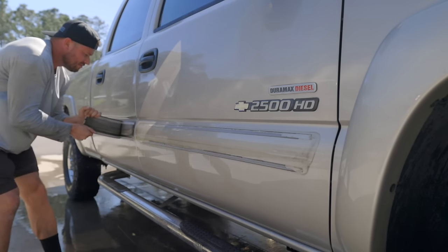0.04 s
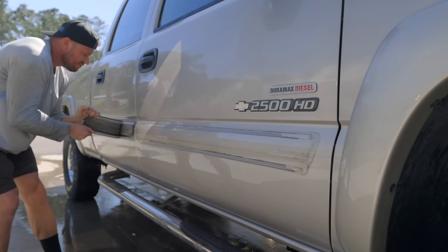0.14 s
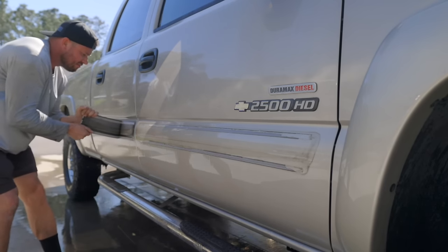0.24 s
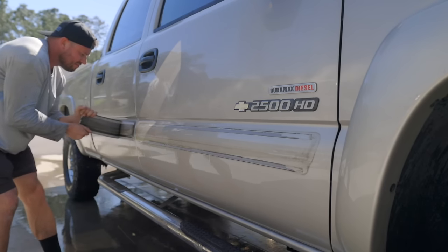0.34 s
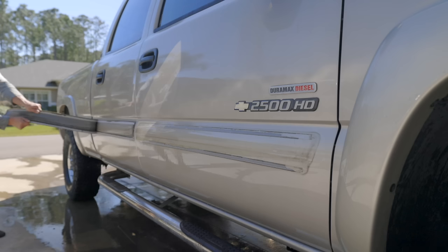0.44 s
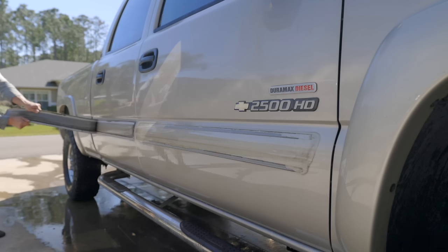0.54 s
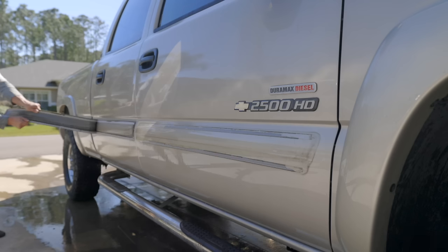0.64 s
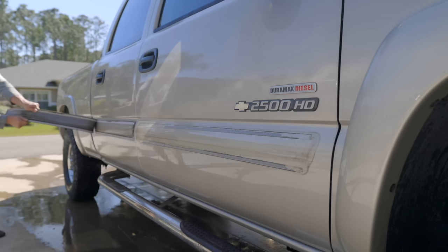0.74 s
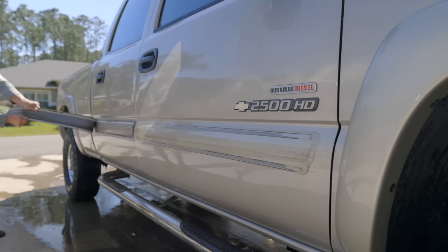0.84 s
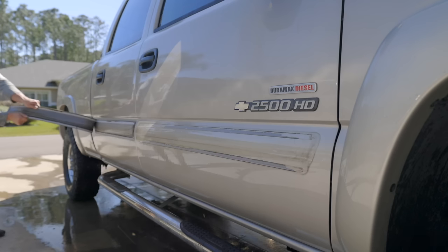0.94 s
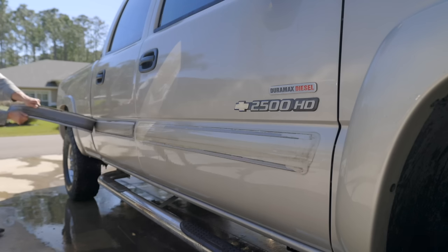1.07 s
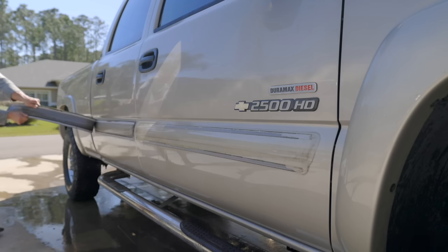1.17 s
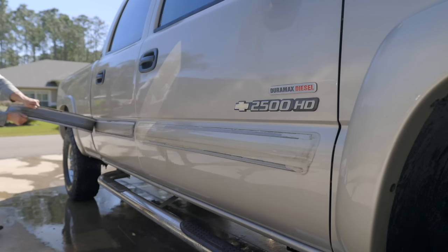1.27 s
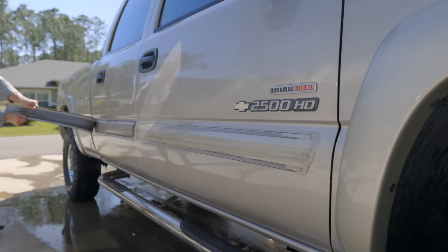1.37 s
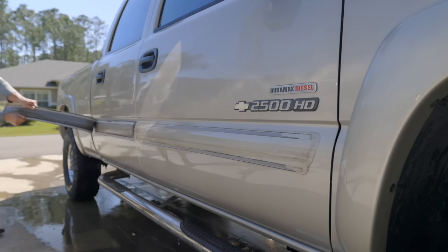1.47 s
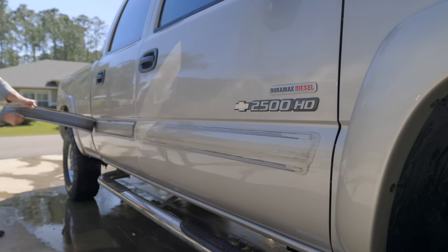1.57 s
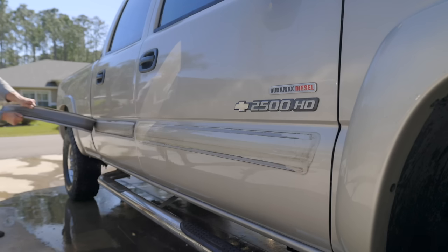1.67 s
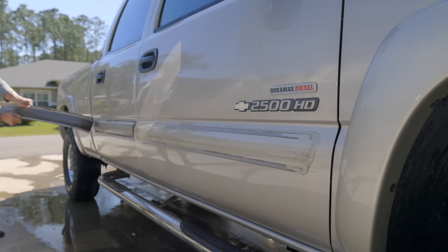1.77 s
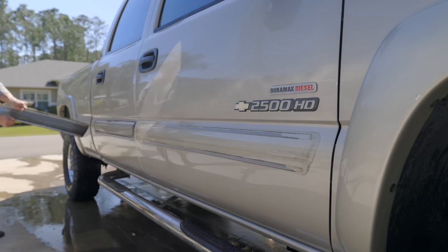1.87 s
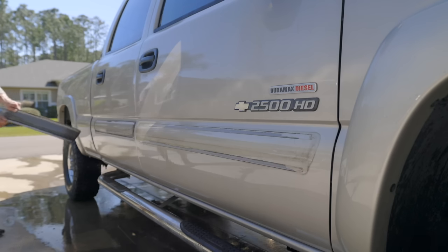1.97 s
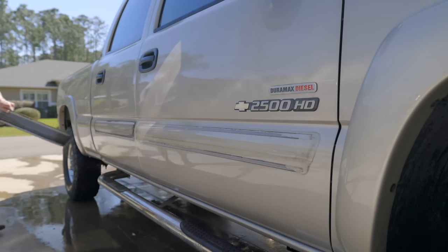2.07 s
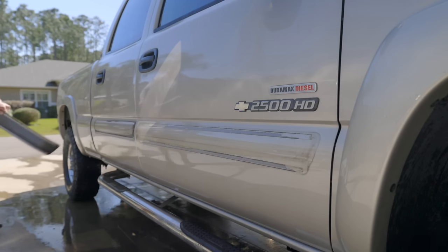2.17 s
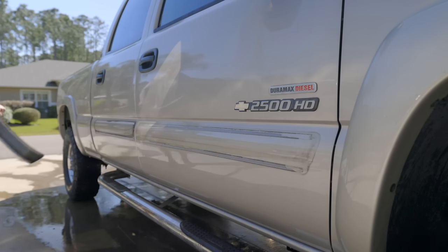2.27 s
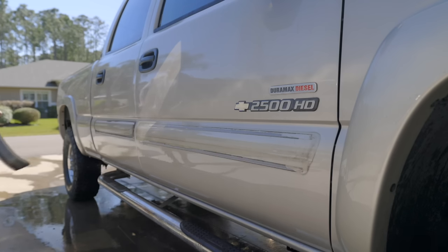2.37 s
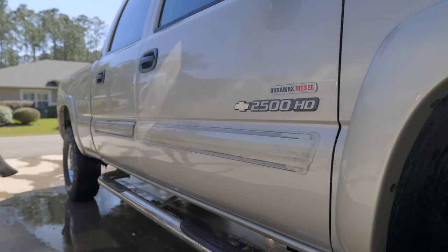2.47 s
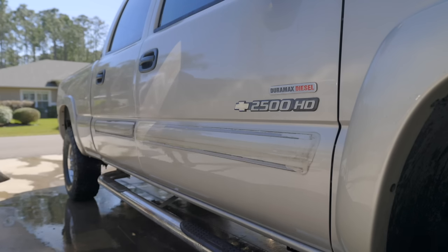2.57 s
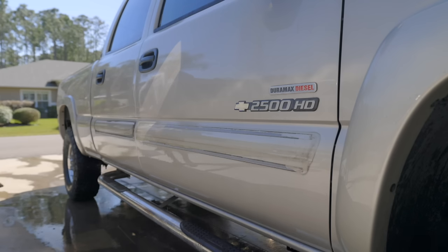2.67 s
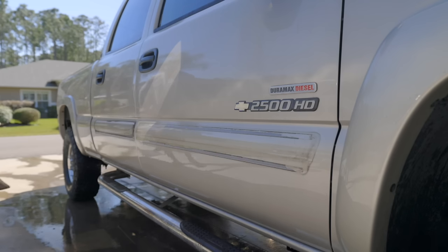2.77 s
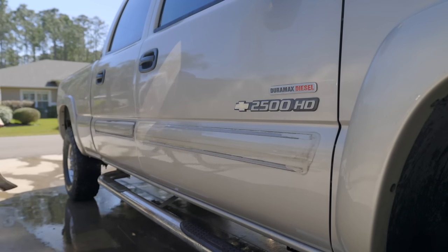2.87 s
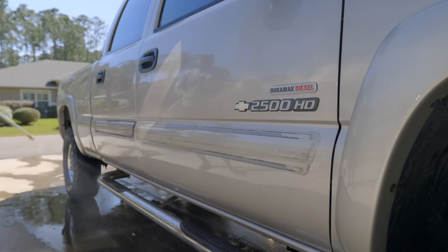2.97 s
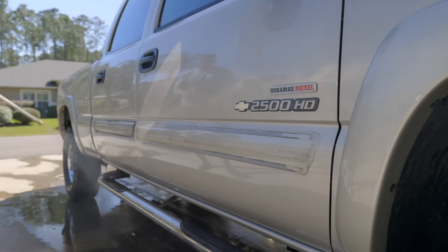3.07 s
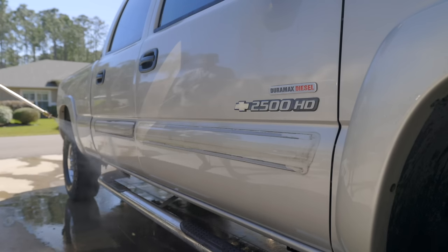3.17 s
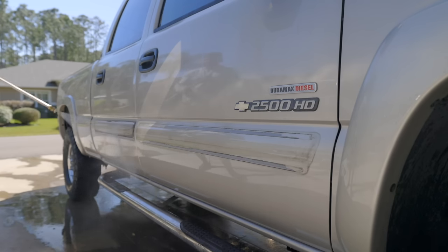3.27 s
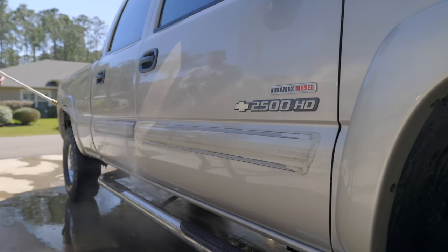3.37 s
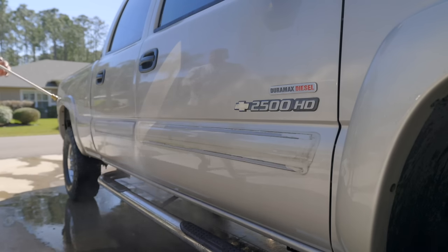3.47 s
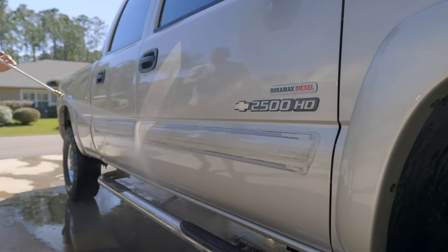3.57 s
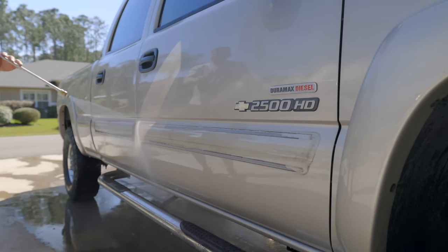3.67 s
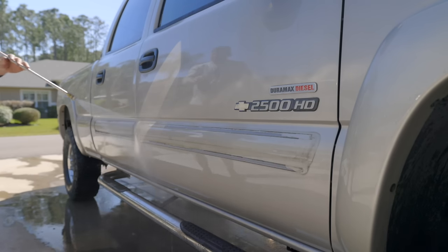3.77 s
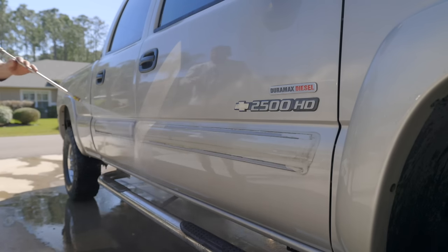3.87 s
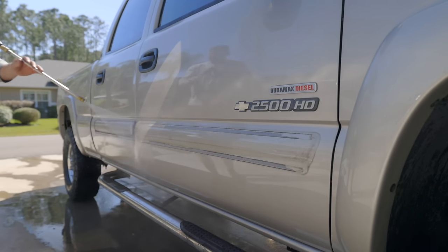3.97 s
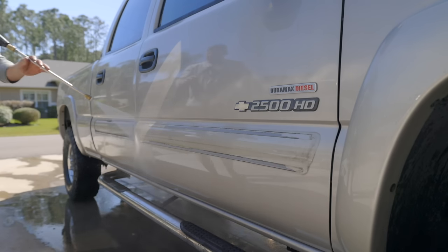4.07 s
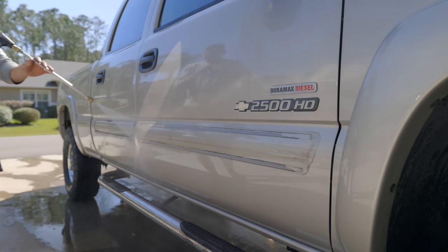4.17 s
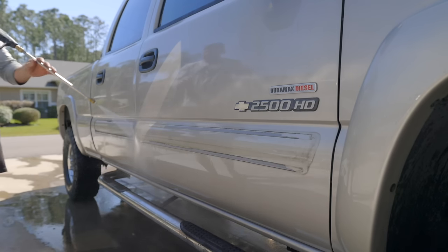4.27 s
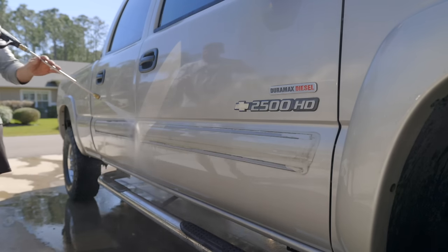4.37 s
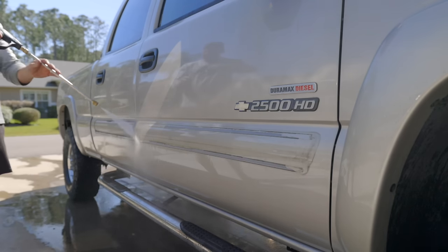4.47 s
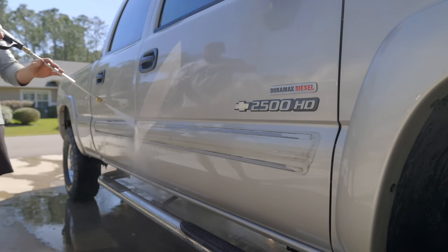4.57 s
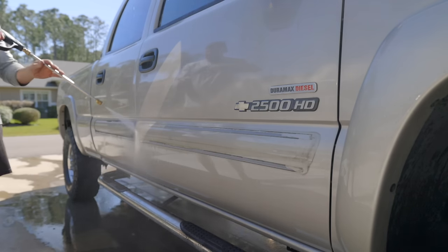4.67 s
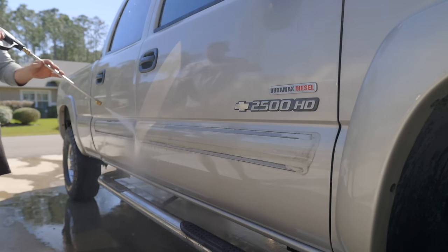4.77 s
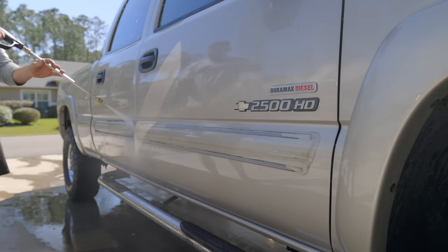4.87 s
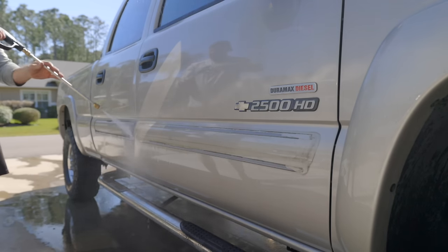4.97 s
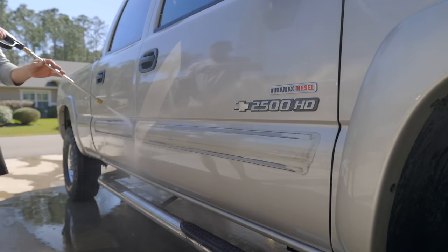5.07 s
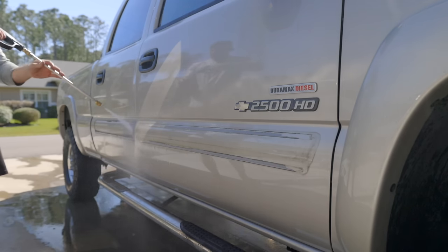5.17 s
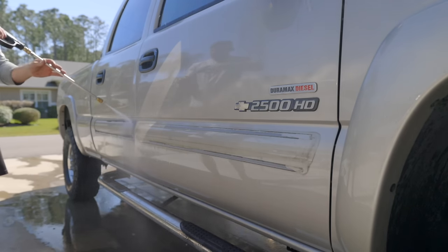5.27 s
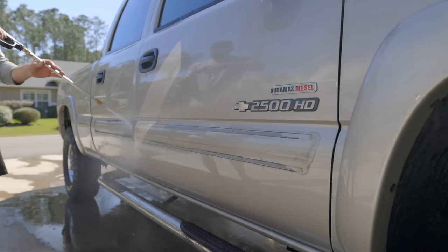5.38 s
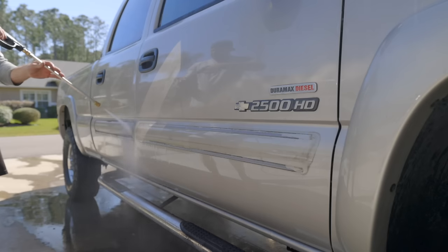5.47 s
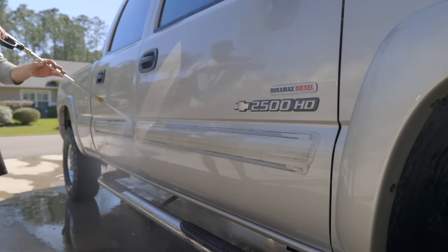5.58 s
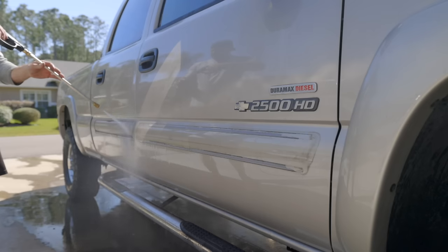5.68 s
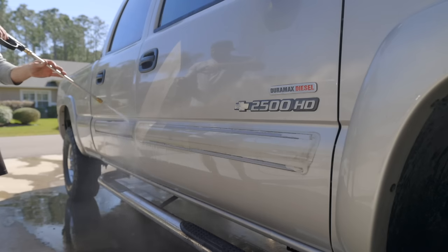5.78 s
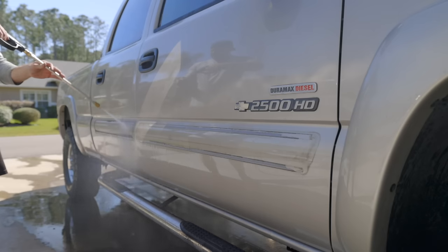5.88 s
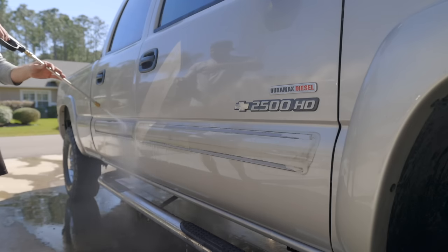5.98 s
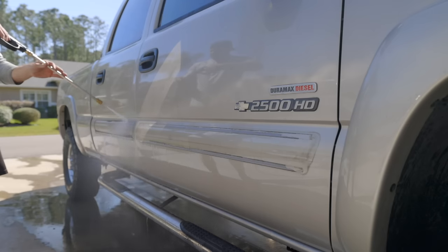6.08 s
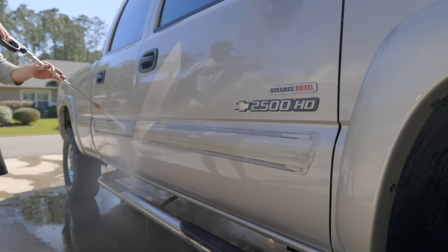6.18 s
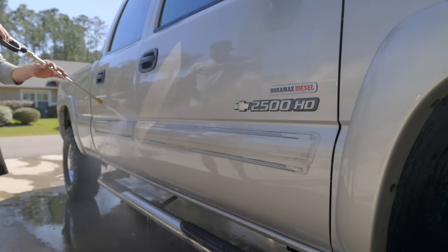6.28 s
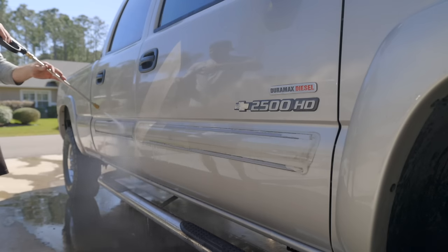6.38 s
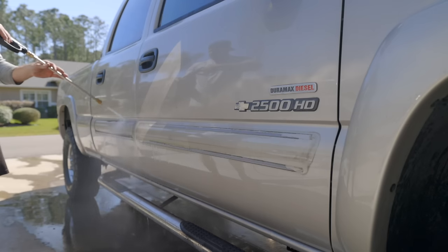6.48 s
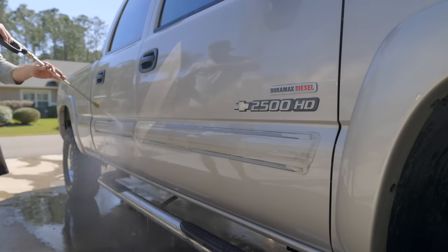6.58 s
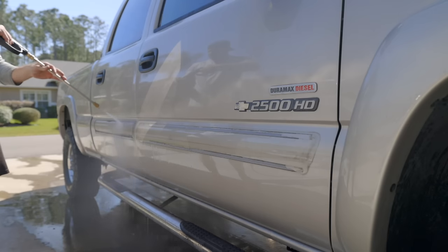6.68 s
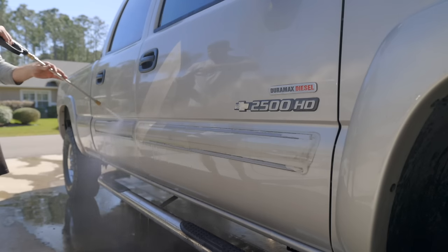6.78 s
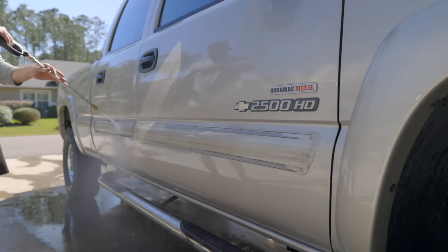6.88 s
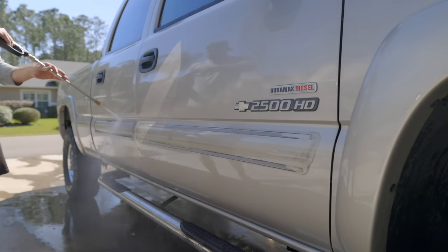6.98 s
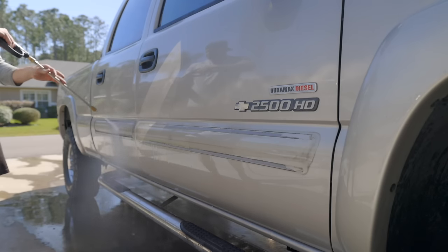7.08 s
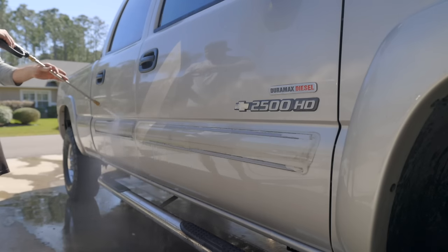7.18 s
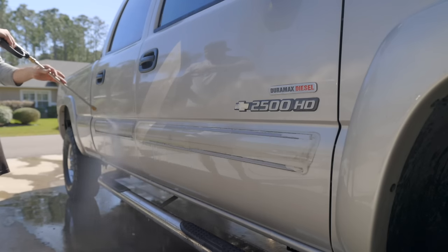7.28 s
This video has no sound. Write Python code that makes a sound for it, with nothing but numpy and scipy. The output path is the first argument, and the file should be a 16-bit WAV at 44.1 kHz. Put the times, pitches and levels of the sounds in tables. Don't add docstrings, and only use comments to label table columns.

```python
import sys
import numpy as np
from scipy import signal
from scipy.io import wavfile
from scipy.ndimage import uniform_filter1d

SR = 44100
rng = np.random.default_rng(int(sys.argv[2]) if len(sys.argv) > 2 else 0)


def wrap_up_sound(samples):
    columns = np.atleast_2d(samples).T
    tamed = np.clip(columns, -1, 1)
    steps = np.round(tamed * 32767).astype(np.int16)
    wavfile.write(sys.argv[1], SR, steps)


def amplitude_ratio(level_db):
    exponent = np.asarray(level_db, float) / 20
    return 10 ** exponent


N = 323023

PEEL_START_S, PEEL_END_S = 0.062, 0.45
OPEN_S, SAG_S = 2.98, 3.1
TURN_S = 5.06


def evened(x):
    return x / np.sqrt(np.mean(x ** 2) + 1e-20)


def curves(rows, t):
    s, *columns = np.transpose(rows)
    return [np.interp(t, s, column) for column in columns]


def passage(t, s, takes_s):
    return 0.5 + 0.5 * np.tanh((t - s) / takes_s)


def swells(rows, t):
    power = 1e-12
    for s, db, rise, fall in rows:
        drop_db = np.where(t < s, rise * (s - t), fall * (t - s))
        power = power + amplitude_ratio(2 * (db - drop_db))
    return 10 * np.log10(power)


def add(mix, s, sound):
    part = mix[max(round(s * SR), 0):][:len(sound)]
    part += sound[:len(part)]


def high(x, hz):
    return signal.sosfilt(signal.butter(4, hz, "high", fs=SR, output="sos"), x)


def resonate(x, hz, width_hz):
    pole = np.exp((-np.pi * width_hz + 2j * np.pi * hz) / SR)
    return 2 * signal.lfilter([1 - abs(pole)], [1, -pole], x).real


def frame_grid(size):
    t = np.arange(4 * N // size + 5) * size / 4 / SR
    return t[None], np.fft.rfftfreq(size, 1 / SR)[:, None]


def band(points, hz, lo_hz, hi_hz):
    f, level = np.transpose(points)
    db = np.interp(np.log(hz + 1), np.log(f + 1), level)
    inside = (hz > lo_hz) & (hz < hi_hz)
    return db - 10 * np.log10(np.sum(amplitude_ratio(2 * db)[inside]))


def noise(field_db, patchy_db, flicker_db, gate=0.84):
    bins, frames = field_db.shape
    size = 2 * bins - 2
    drive = np.pad(gate * rng.standard_normal(N), (0, 2 * size))
    z = signal.stft(drive, nperseg=size, noverlap=3 * size // 4)[2][:, :frames]
    patches = uniform_filter1d(rng.standard_normal((frames, bins)).T, size=9, axis=0)
    patches = evened(uniform_filter1d(patches, size=16, axis=1))
    flicker = evened(uniform_filter1d(rng.standard_normal(frames), size=5))
    z = z * amplitude_ratio(field_db + patchy_db * patches + flicker_db * flicker)
    return signal.istft(z, nperseg=size, noverlap=3 * size // 4)[1][:N] * np.sqrt(bins)


def crackle(per_s, spread_db, puff_s):
    size = amplitude_ratio(spread_db * np.minimum(rng.exponential(1, N), 4))
    puffs = size * (rng.random(N) < per_s / SR)
    decay = np.exp(-np.arange(600) / SR / puff_s)
    return evened(np.convolve(puffs, decay)[:N])


# freq_hz, level_db_per_hz
HUM_SPECTRUM = [(18, -62.5), (30, -41), (79, -14), (105, -9.5), (156, 0), (187, -14), (263, -12.5),
                (379, -18.5), (1910, -25.5), (3320, -47.5), (13600, -69), (15500, -60.5)]
# freq_hz, level_db_per_hz
RUSTLE_SPECTRUM = [(880, -31), (1500, -31), (2400, -5.5), (2980, -9.5), (8050, -17), (13800, -22.5),
                   (15700, -25)]
# peak_s, level_db, rise_db_per_s, fall_db_per_s
RUSTLE_SWELLS = [(.06, -59, 300, 45), (.77, -53, 53, 150), (.5, -66.5, 60, -1), (1.1, -74, 28, 60),
                 (1.29, -67, 40, 200), (1.83, -56.5, 70, 170), (2.22, -60, 170, 15), (2.46, -59, 40, 44),
                 (2.62, -62.5, 60, 40)]


def yard():
    t, hz = frame_grid(1024)
    hum_db = -45.5 - 6.5 * (t < PEEL_END_S)
    hum = noise(band(HUM_SPECTRUM, hz, 100, 1000) + hum_db, 1.1, 0.4)
    t, hz = frame_grid(256)
    rustle_db = band(RUSTLE_SPECTRUM, hz, 3000, 10000) + swells(RUSTLE_SWELLS, t)
    grains = 0.9 + 0.1 * crackle(40, 2.5, 0.001)
    return hum + noise(rustle_db, 1.2, 0.8, grains)


# freq_hz, level_db, t60_s
DOOR_MODES = [(164, -17, 0.32), (213, -17.5, 0.23), (269, -8, 0.25), (300.4, -0.5, 0.37), (365, -5.5, 0.47),
              (445, -1.5, 0.071), (466.4, -10, 0.35), (520, -9, 0.22), (627, -26, .13), (1020, -31, .09)]
# start_s, level_db, thud_over_ring_db, thud_hz, ring_length_factor
DOOR_BLOWS = [(.0025, -9, 8, 540, 0.067), (0.0136, -16.5, -2, 420, 0.23), (.783, -11.5, 1.5, 990, 0.7),
              (.788, -4.5, -1, 665, 0.79), (.798, -11, -17, 910, 0.44), (1.833, -6.5, -2.5, 1340, 0.71),
              (1.837, -8.5, -6, 594, 0.97), (1.851, -7.5, -22, 900, 0.68)]


def knocks():
    out, t = np.zeros(N), np.arange(SR // 2) / SR
    for s, db, thud_db, thud_hz, length in DOOR_BLOWS:
        modes = 0
        for hz, mode_db, t60_s in DOOR_MODES:
            modes = modes + amplitude_ratio(mode_db - 60 * t / (t60_s * length)) * np.sin(2 * np.pi * hz * t)
        rattle = evened(resonate(rng.standard_normal(len(t)), 0, 40))
        modes = modes * (1 + 0.24 * rattle)
        hit = rng.standard_normal(len(t)) + 9 * (t == t[20])
        thud = evened(resonate(resonate(hit, thud_hz, 480), thud_hz, 1100))
        thud = thud * amplitude_ratio(thud_db - 60 * t / (0.22 * length))
        onset = np.minimum(t / 0.0012, 1)
        add(out, s, amplitude_ratio(db - 8.5) * (modes + thud) * onset)
    return high(out, 103)


# start_s, level_db, ring_hz, t60_s, crack_over_ring_db
CLIP_POPS = [(.0029, 0, 3800, 0.015, -8), (.0027, -8, 7750, 0.012, -12), (.0046, -16, 3450, 0.059, -1),
             (0.035, -34, 4000, .044, 3), (.069, -36, 3500, .04, -3), (.396, -35, 13500, .015, -8),
             (.764, -36, 8000, 0.036, 4), (.782, -9, 2530, .029, -9.5), (.849, -6, 2350, 0.023, -8),
             (1.2, -26, 5200, 0.03, -7), (1.8325, -19, 8500, 0.023, -3), (1.921, -39, 5950, .03, -12)]
# start_s, level_db, ring_hz, t60_s, crack_over_ring_db
STRIP_SLAPS = [(.778, -16, 1300, 0.031, 0.5), (.789, -15, 1800, 0.067, -15), (0.853, -23, 3060, 0.11, 6.5),
               (1.824, -32, 5000, .03, -2), (1.8321, 0, 2930, .014, -2), (1.838, -4.5, 3000, .031, -2.5),
               (1.845, -12, 2930, 0.13, -14), (1.869, -19.5, 4000, .06, -15), (1.9, -30.5, 3500, 0.12, -8)]
# start_s, level_db
GLUE_TICKS = [(.888, -42), (.925, -54), (.94, -51), (1.998, -57), (2.034, -53), (2.2, -49)]


def snaps():
    out, t = np.zeros(N), np.arange(SR // 4) / SR
    clip_dull_hz, slap_dull_hz = 12000, 5740
    rows = [(*row, clip_dull_hz) for row in CLIP_POPS]
    rows += [(*row, slap_dull_hz) for row in STRIP_SLAPS]
    rows += [(*row, 7000, 0.022, 5, clip_dull_hz) for row in GLUE_TICKS]  # ring_hz, t60_s, crack_db
    for s, db, hz, t60_s, crack_db, dull_hz in rows:
        air = rng.standard_normal(len(t)) + amplitude_ratio(15) * (t == t[8])
        crack = signal.sosfilt(signal.butter(3, [1200, dull_hz], "band", fs=SR, output="sos"), air)
        ring = resonate(resonate(air, hz, 0.32 * hz), hz, 0.36 * hz)
        decay = amplitude_ratio(-60 * t / t60_s) + amplitude_ratio(-60 - 60 * t / 0.17)
        add(out, s, amplitude_ratio(db - 12) * (evened(ring) + amplitude_ratio(crack_db) * evened(crack)) * decay)
    return out


# freq_hz, level_db_per_hz
GLUE_SPECTRUM = [(1180, -51), (2000, -21), (2750, -23), (2970, -3), (3440, -0.5), (4820, -5), (6800, -10),
                 (7480, -4), (8300, -12), (13200, -17), (15700, -18)]
# freq_hz, level_db_per_hz
SCUFF_SPECTRUM = [(260, -31), (450, -1), (586, -2.5), (1120, -1), (1690, -7), (2070, -3), (5700, -9.5),
                  (15000, -34.5)]
# start_s, length_s, level_db
SCUFF_STROKES = [(1.046, 0.035, -44), (1.2, 0.031, -38.5), (1.854, 0.012, -38), (1.903, 0.031, -46)]


def peel():
    t, hz = frame_grid(256)
    now = np.arange(N) / SR
    tear_db, last_tug_db = -48, -53
    tear_db = swells([(PEEL_START_S, tear_db, 340, 26), (PEEL_END_S, last_tug_db, 120, 0)], t)
    threads = 0.31 + 0.34 * crackle(320, 3.0, 0.003)
    tear = noise(band(GLUE_SPECTRUM, hz, 3000, 10000) + tear_db, 1.2, 0.6, threads)
    shudder = evened(resonate(resonate(rng.standard_normal(N), 250, 350), 350, 600))
    tear += amplitude_ratio(-43 - 10 * now) * shudder
    rub = noise(band(SCUFF_SPECTRUM, hz, 2000, 9000) + 0 * t, 0.94, 1.8)
    strokes = 0
    for s, length_s, db in SCUFF_STROKES:
        rise_db = 2500 * np.maximum(s - now, 0)
        fall_db = 600 * np.maximum(now - s - length_s, 0)
        strokes = strokes + amplitude_ratio(db - rise_db - fall_db)
    return tear * (1 - passage(now, PEEL_END_S, 0.004)) + strokes * rub


def pressure(t):
    drain = np.clip(0.31 + 0.63 * (t - OPEN_S) / (SAG_S - OPEN_S), 0, 1)
    after_s = np.maximum(t - SAG_S, 0)
    return drain * np.exp(-after_s / 0.074), np.exp(-after_s / 0.59)


# peak_s, swell_db
WRIST_WAGS = [(3.12, 4.5), (3.27, 1.5), (3.47, 2), (3.58, 2), (3.89, 3.5), (4.11, 2), (4.23, 3.5),
              (4.49, 3.5), (4.68, 3.5), (4.86, 2), (4.97, 2.5), (5.43, 3.5), (5.68, 3.5), (5.9, 4),
              (6.15, 5), (6.38, 4), (6.62, 5.5), (6.845, 5), (7.07, 3.5), (7.31, 5.5)]


def wags(t):
    half_width_s = 0.053
    return sum(db * np.exp(-0.5 * ((t - s) / half_width_s) ** 2) for s, db in WRIST_WAGS)


# time_s, lag_ms, phase_slip_turns
GROUND_LAG = [(2.97, .69, .12), (3.5, .667, .12), (4.5, .652, .11), (5.2, .645, .16), (6., .642, .22),
              (7.33, .634, .23)]


def echo_comb_db(t, hz):
    settle = pressure(t)[1]
    lag_ms, slip = curves(GROUND_LAG, t)
    ground = 0.25 + (0.15 - 0.25) * settle
    sill = 0.09 * np.exp(-0.5 * ((t - 3.36) / 0.6) ** 2)
    sill_ms, sill_turns = 0.343, -0.28
    echo = ground * np.exp(-2j * np.pi * (hz * lag_ms / 1000 - slip))
    echo = echo + sill * np.exp(-2j * np.pi * (hz * sill_ms / 1000 - sill_turns))
    scatter = 1 + (hz / 13000) ** 4
    return 20 * np.log10(abs(1 + echo / scatter))


# freq_hz, level_db_per_hz
HISS_SPECTRUM = [(300, -24), (1200, -24), (2200, -8), (2750, -8.5), (3400, -4.5), (4400, -10.5),
                 (5500, -9.5), (6500, -6), (8200, -5), (10500, -11), (12500, -10), (14200, -14.5),
                 (15000, -15), (15800, -17.5)]


def hiss(t, hz):
    sag, settle = pressure(t)
    turned = passage(t, TURN_S, 0.068)
    level_db = -27.5 - 4 * sag - 1.5 * settle + 3.5 * turned + 0.2 * wags(t)
    tilt_db = -0.4 - 15 * sag - 6.5 * settle - 1.17 * turned
    tilt_db = tilt_db * np.log2(np.maximum(hz / 5000, 1))
    return noise(band(HISS_SPECTRUM, hz, 3460, 8210) + level_db + tilt_db + echo_comb_db(t, hz), 0.9, 0.18)


# freq_hz, level_db_per_hz
SQUARE_SPECTRUM = [(30, -50), (70, -3.5), (180, -12), (450, 4.5), (850, 5), (1400, 3), (2100, -7),
                   (3000, -7.5), (6000, -19)]
# freq_hz, level_db_per_hz
GLANCING_SPECTRUM = [(30, -55), (70, -20), (180, -16.5), (450, -6), (850, -5.5), (1300, -2), (2300, -2.5),
                     (2750, -9), (6000, -33.5)]
# time_s, splash_db, drum_db
WAND_PATH = [(2.98, -32.5, -53), (3.2, -38.5, -52.5), (3.44, -35.5, -39), (3.52, -35, -26),
             (3.75, -30.5, -25), (3.85, -30.5, -20), (4.15, -26, -16), (4.7, -21.5, -18),
             (5.1, -25.5, -16.5), (5.45, -27.5, -23.5), (6.0, -28, -31.5), (6.6, -28, -37.5),
             (7.32, -28, -38)]


def splash(t, hz):
    turned = passage(t, TURN_S, 0.068)
    aim = np.clip(0.45 + (0.91 - 0.45) * passage(t, TURN_S + 0.13, 0.16), 0, 1)
    colour_db = (1 - aim) * band(SQUARE_SPECTRUM, hz, 900, 2200)
    colour_db = colour_db + aim * band(GLANCING_SPECTRUM, hz, 900, 2190)
    body_db = -13 * (1 - passage(t, 3.25, 0.044)) - 1.03 + 2 * turned
    body_db = body_db / (1 + (hz / 950) ** 4)
    level_db = curves(WAND_PATH, t)[0] + wags(t)
    return noise(colour_db + body_db + level_db + echo_comb_db(t, hz), 0.7, 0.3)


# freq_hz, width_hz, level_db
DRUM_MODES = [(211, 52, -14), (282.7, 26, -2.5), (343.3, 50, 1.1), (401.5, 50, -1), (462.4, 65, -6.5),
              (540, 59, -9), (668, 117, -15)]


def drumming(t):
    drops, drum = rng.standard_normal(N), 0
    for k, (hz, width_hz, db) in enumerate(DRUM_MODES):
        mode = evened(resonate(resonate(drops, hz, width_hz), hz, 2.06 * width_hz))
        drum = drum + (-1) ** k * amplitude_ratio(db) * mode
    level_db = curves(WAND_PATH, t)[1] + 0.32 * wags(t)
    level_db = np.interp(np.arange(N) / SR, t[0], level_db[0])
    level_db += 1.5 * evened(resonate(rng.standard_normal(N), 0, 25))
    return amplitude_ratio(level_db) * evened(drum)


def jet():
    t, hz = frame_grid(512)
    open_for_s = np.arange(N) / SR - OPEN_S
    valve = np.clip(open_for_s / 0.0018, 0, 1)
    valve = valve * (1 - 0.43 * np.exp(-np.maximum(open_for_s, 0) / 0.014))
    return valve * high(hiss(t, hz) + splash(t, hz) + drumming(t), 65)


def scene():
    return np.tile(yard() + knocks() + snaps() + peel() + jet(), (2, 1))


def low_pass(x):
    return signal.sosfilt(signal.butter(12, 17090, fs=SR, output="sos"), x)


def record(dry):
    cut = high(0.95 * np.tanh(dry / 0.95), 35)
    lowpass = signal.firwin(801, 15730, window=("kaiser", 10), fs=SR)
    cut = signal.oaconvolve(cut, lowpass[None], "same")
    hz, t, z = signal.stft(cut, SR, nperseg=1024)
    top = hz > 12850
    top_power = uniform_filter1d(abs(z[0, top]) ** 2, size=24, axis=0)
    z[:, top] *= uniform_filter1d(top_power, size=3) > amplitude_ratio(2 * -92.3)
    for when, where in rng.random((13, 2)):
        lo_hz = 4800 + where * (12500 - 4800)
        s = SAG_S + when * (t[-1] - SAG_S)
        cell = ((hz > lo_hz) & (hz < 1.15 * lo_hz))[:, None] & (abs(t - s) < 0.02)
        z[1] *= np.where(cell, np.exp(2j * np.pi * rng.random(cell.shape)), 1)
    mix = signal.istft(z, SR, nperseg=1024)[1][:, :N]
    return low_pass(mix)


dry = scene()
out = record(dry)
wrap_up_sound(out)
```